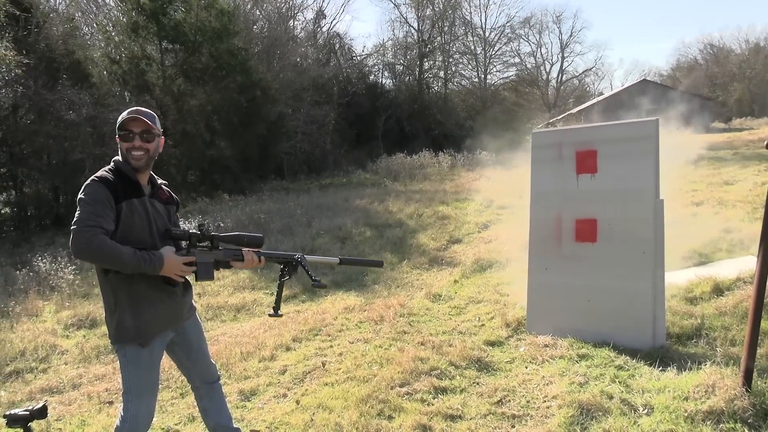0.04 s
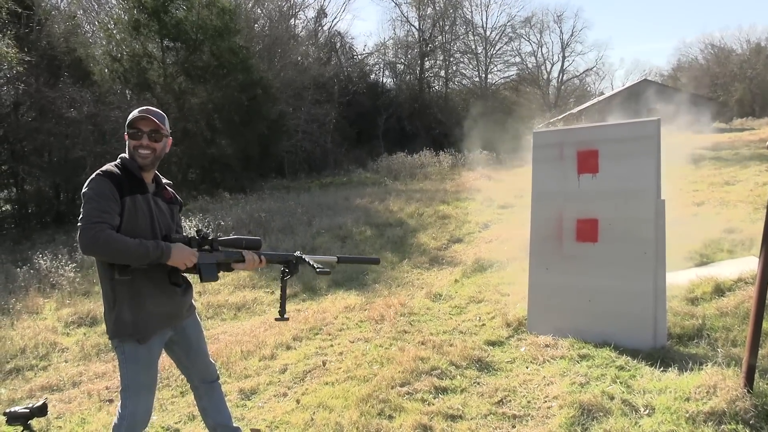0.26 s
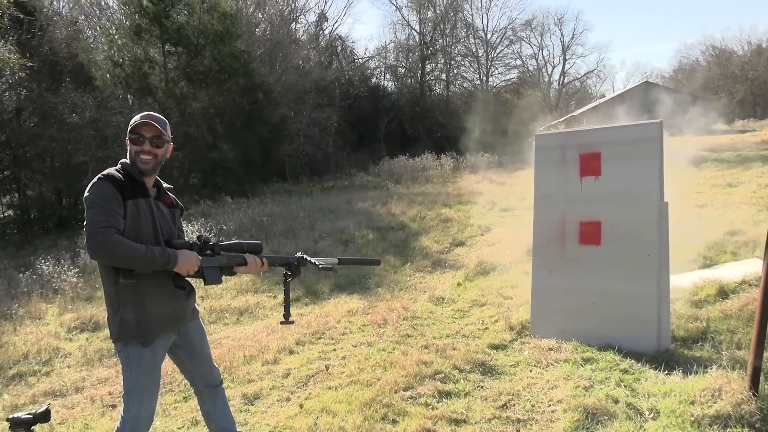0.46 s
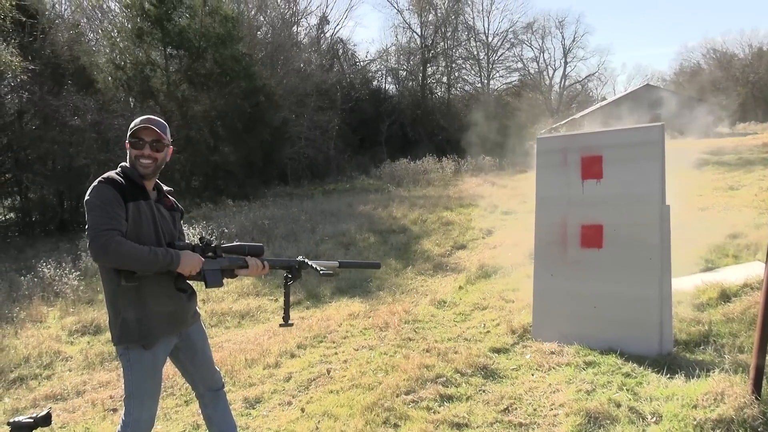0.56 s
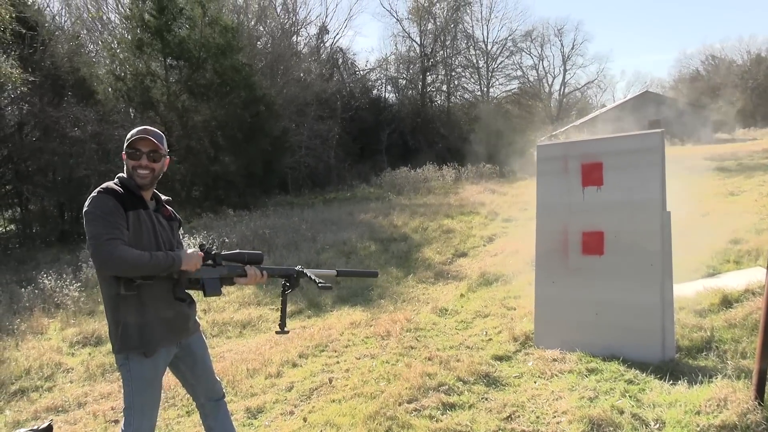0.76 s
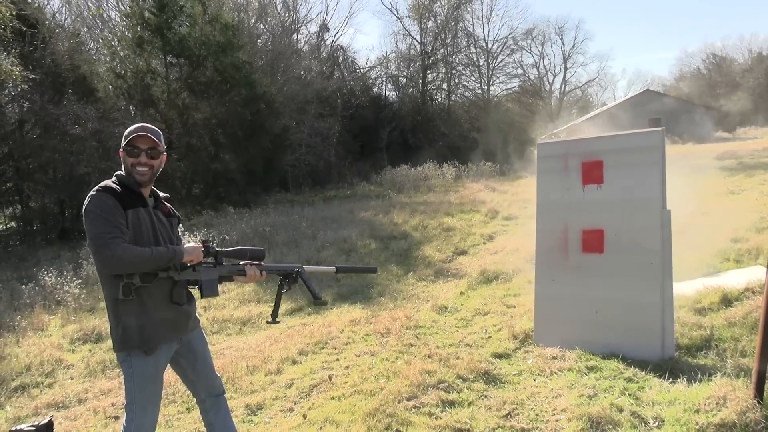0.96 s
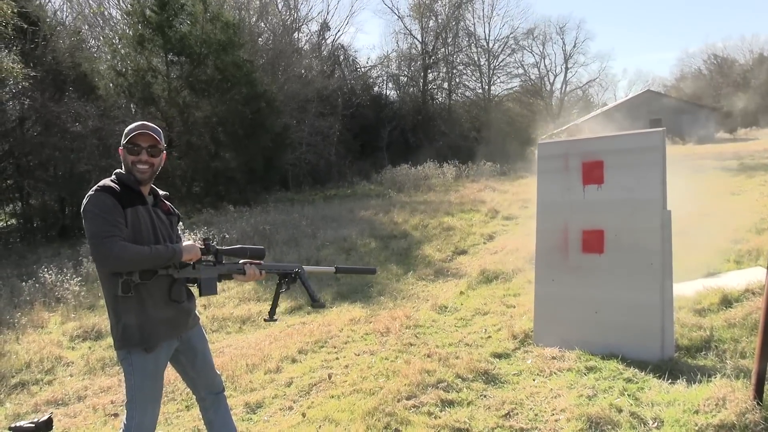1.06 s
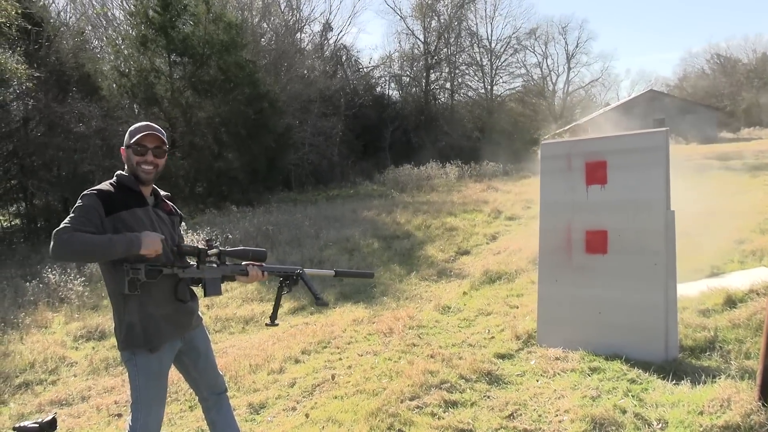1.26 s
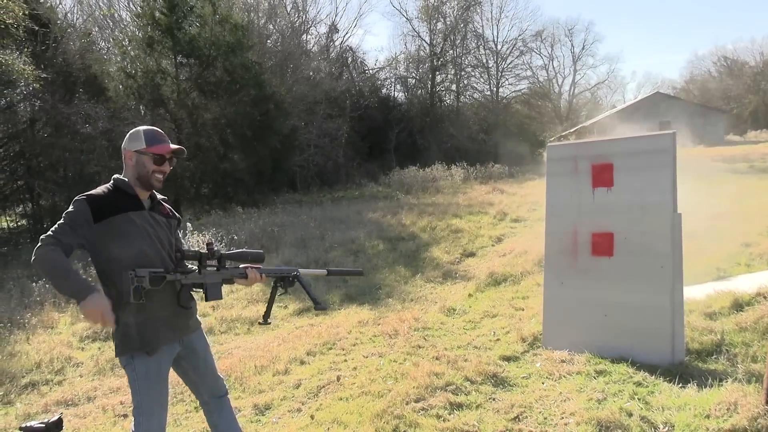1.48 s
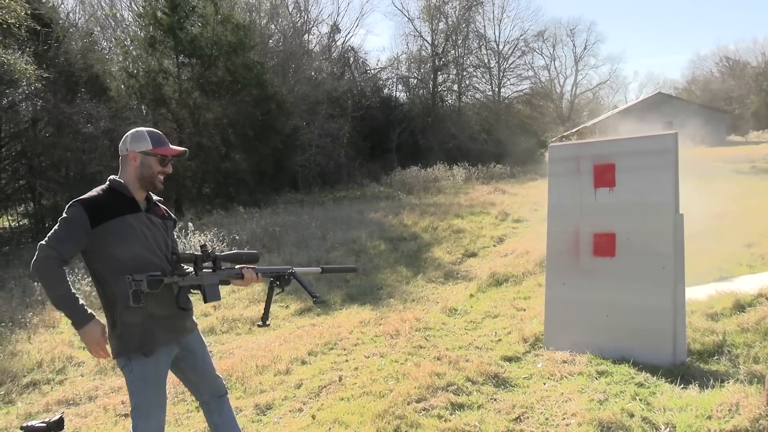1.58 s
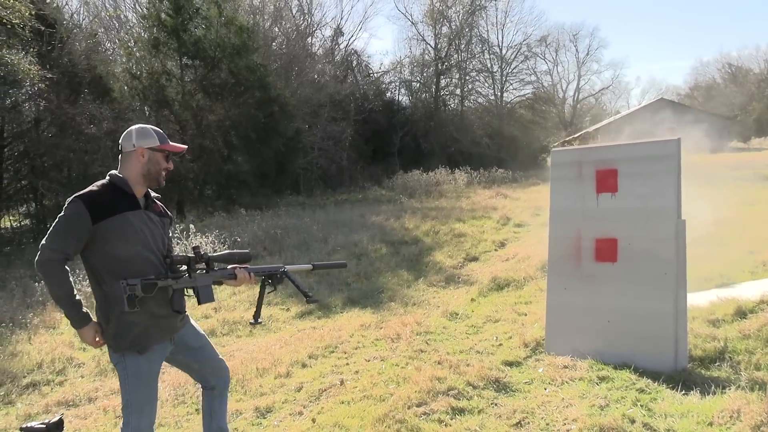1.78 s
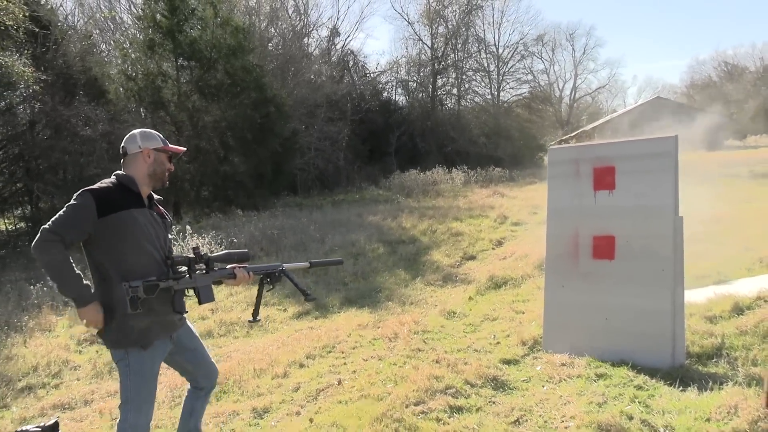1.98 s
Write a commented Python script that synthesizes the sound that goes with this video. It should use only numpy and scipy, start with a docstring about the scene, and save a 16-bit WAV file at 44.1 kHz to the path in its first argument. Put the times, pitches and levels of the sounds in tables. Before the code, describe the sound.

Rifle bolt snaps back with a tight bright double crack, then slides forward and locks in a quick cluster of clicks; open range, faint reflections, low wind buffeting the nearly mono microphone, cloth rustle at the end.

```python
"""Rifle bolt worked on a grass range

A few metres from the microphone a bolt is pulled back against its stop, then pushed home.
Each steel contact is a noise crack plus dying sines; sliding is gritty noise, and a small part pings.
A concrete wall and trees return faint echoes as filtered noise tails.
Shaped noise makes the wind buffeting the microphone and a jacket that rustles most at the end."""
import sys
import numpy as np
from scipy import signal
from scipy.fft import rfft, irfft
from scipy.io import wavfile
from scipy.ndimage import uniform_filter1d

SR = 44100
rng = np.random.default_rng(int(sys.argv[2]) if len(sys.argv) > 2 else 0)


def store_pcm(level_fs):
    """Save levels as 16-bit WAV."""
    pcm = np.round(np.clip(level_fs, -1, 1) * 32767).astype(np.int16)
    wavfile.write(sys.argv[1], SR, np.atleast_2d(pcm).T)


N = 89434  # length [samples]


def bolt():
    """Both strokes: sums the steel contacts, loose parts, squeaks, ping and friction."""
    return strokes() + loose_part() + handle_knock() + squeaks() + pinging_part() + sliding()


# Contacts as the bolt is pulled back:
# (time [s], relative level [dB], T60 [s], bass [dB], treble [dB], relative ring level [dB])
PULL_CONTACTS = [(.590, -52.5, 0.078, -2, -24, -18), (.660, -47, 0.074, -14.5, -18.5, -15.5),
                 (.672, -46, 0.032, 3.5, -26.5, -18), (.8257, -12, 0.014, -13, -3.5, -15),
                 (.8281, -22, 0.054, 3, -6.5, -23), (.8372, -23, 0.018, 5.5, 13.5, -17.5),
                 (.8389, -10, 0.0088, -8, 7, -3.5), (.8408, -16, 0.015, -3, -8, 5),
                 (.852, -36.5, 0.023, -5.5, 8.5, -12.5), (.876, -30.5, 0.027, 4, -7.5, -6),
                 (.881, -44, 0.038, 4, -7, -12), (.896, -48.5, .03, 1.5, 1.5, -11.5)]
# Contacts as the bolt runs forward and shuts, same columns
PUSH_CONTACTS = [(1.076, -49.5, 0.036, 5.5, -11, -6), (1.1338, -34, 0.015, 7.5, -1, -23),
                 (1.1375, -29, 0.021, 7, -9.5, -2), (1.1528, -41, 0.041, -1.5, -3, -10.5),
                 (1.1578, -50, 0.028, -3, -0.5, -10), (1.166, -25, 0.034, -6.5, -1.5, -14.5),
                 (1.181, -38, 0.032, 0.5, 1, -9), (1.1855, -20, 0.023, -17.5, -3.5, -26),
                 (1.1882, -27.5, .035, -9, -14.5, -16), (1.1972, -17.5, 0.011, -21, 4.5, -26.5),
                 (1.2029, -14, 0.011, -22, -5, -24.5), (1.2107, -18, 0.015, 10, 10, -13.5),
                 (1.2123, -9.5, .022, -0.5, 2, 1.5), (1.2175, -19, 0.028, 3.5, -27, -0.5)]
# Colour of a crack at the rear stop: (frequency [Hz], level [dB])
OPEN_CRACK_COLOUR = [(100, -36.5), (300, -24.5), (430, -13), (600, -0.5), (820, -4), (1400, -2),
                     (2100, -0.5), (2900, 0), (4200, -1.5), (5000, -0.5), (5800, -6), (7200, 0),
                     (8900, -5.5), (10000, -13.5), (14000, -18), (16000, -30)]
# Colour of a crack as the bolt shuts: (frequency [Hz], level [dB])
SHUT_CRACK_COLOUR = [(100, -33), (300, -26), (480, -10.5), (640, -2), (800, -10), (1000, -3), (1300, -6.5),
                     (1550, -1), (1850, 1.5), (2300, 2.5), (3500, -1.5), (4000, -1.5), (4400, 1.5),
                     (5000, -3.5), (8500, -8.5), (10000, -13.5), (14000, -11), (16000, -29)]
# Modes of the action with the bolt back: (frequency [Hz], level [dB], T60 [s])
BOLT_BACK_MODES = [(547, -23, 0.031), (608, -19, 0.036), (1560, -34.5, 0.031), (2050, -20, .03),
                   (2690, -19.5, 0.062), (2912, -22.5, 0.034), (3630, -10, 0.018), (6600, -21, 0.015),
                   (7150, -15.5, 0.017), (7680, -21, 0.018), (8600, -21.5, 0.021)]
# Modes of the action with the bolt forward: (frequency [Hz], level [dB], T60 [s])
BOLT_FORWARD_MODES = [(338, -38, .18), (610, -41, .14), (660, -20, .035), (921, -23, .06), (974, -20, .12),
                      (1025, -17, .05), (1620, -31, .04), (2175, -21, .04), (2270, -16, .04),
                      (2412, -24, .11), (2710, -19, .055), (3040, -25, .06), (3354, -24, .045),
                      (3520, -21, .05), (3700, -28, .1), (4590, -25, .05), (6280, -20, .035)]


def strokes():
    """Steel meets steel on the way back, then on the way forward, exciting the action each time."""
    out = np.zeros(N)
    for s, *row in PULL_CONTACTS:
        add(out, s, contact(*row, OPEN_CRACK_COLOUR, BOLT_BACK_MODES))
    for s, *row in PUSH_CONTACTS:
        add(out, s, contact(*row, SHUT_CRACK_COLOUR, BOLT_FORWARD_MODES))
    return out


ATTACK_S = 0.00031  # time constant of every onset [s]
BASS_HZ, TREBLE_HZ = 1130, 6030  # corners of the bass and treble shelves [Hz]
RATTLE = .02  # rms share by which the pitch of a loose part wavers


def contact(db, t60, bass_db, treble_db, ring_db, colour, modes):
    """A crack of dense short resonances, as decaying noise, plus the clear modes of the action."""
    t = np.arange(SR // 8) / SR
    envelope = amp(-60 * t / t60) * (1 - np.exp(-t / ATTACK_S))
    burst = unit(rng.standard_normal(len(t)) * envelope)
    burst = burst * np.sqrt(np.mean(envelope ** 2))

    def crack_db(f):
        bass = bass_db / (1 + (f / BASS_HZ) ** 2)
        treble = treble_db * f ** 4 / (f ** 4 + TREBLE_HZ ** 4)
        return read(colour, f) + bass + treble

    crack = causal(burst, crack_db)
    # the action wavers half as much as a loose part
    sound = amp(ring_db + 7.5) * ring(modes, rattle=RATTLE / 2)
    add(sound, 0, amp(8.5) * crack)
    return amp(db) * sound


RATTLE_HZ = 110  # the waver is noise averaged over half a period of this frequency [Hz]


def ring(modes, pitch=1, length=1, rattle=0):
    """Dying sines of a struck part; rattle makes the pitch of each one waver at random."""
    t = np.arange(SR // 2) / SR
    tones = np.zeros(len(t))
    for hz, db, t60 in modes:
        waver = uniform_filter1d(rng.standard_normal(len(t)), size=round(SR / RATTLE_HZ / 2))
        frequency = hz * pitch * (1 + rattle * unit(waver))
        turns = np.cumsum(frequency) / SR + rng.random()
        decay = amp(db - 60 * t / (t60 * length))
        tones += decay * np.sin(2 * np.pi * turns)
    return tones * (1 - np.exp(-t / ATTACK_S))


# Small pinging part: (frequency [Hz], level [dB], T60 at full ring time [s])
PING_MODES = [(9857, -22, .2), (9795, -33, .24), (14935, -42, .17), (15520, -37, .17), (15628, -34, .19)]
# Blows on it: (time [s], level [dB], pitch ratio, share of the full ring time)
PING_BLOWS = [(1.166, -13, 1.042, .35), (1.186, -19, 1.005, .6), (1.2115, 0, 1, 1)]


def pinging_part():
    """High modes of a small part, set ringing by the closing stroke."""
    out = np.zeros(N)
    for s, db, pitch, length in PING_BLOWS:
        add(out, s, amp(db) * ring(PING_MODES, pitch, length))
    return out


# Squeaks of steel just before the bolt locks: (time [s], level [dB], frequency [Hz], T60 [s])
SQUEAKS = [(1.1955, -27.5, 7980, 0.0084), (1.2024, -10, 5090, 0.0083)]


def squeaks():
    """Each short squeak of steel is one rapidly dying sine."""
    out = np.zeros(N)
    for s, db, hz, t60 in SQUEAKS:
        add(out, s, ring([(hz, db, t60)]))
    return out


# Loose part shaken by the stop: (frequency [Hz], level [dB], T60 [s])
LOOSE_MODES = [(601, -5, 0.19), (973, 6.5, 0.13), (1810, -11, 0.078), (3020, -9, 0.32), (3530, -15.5, 0.2),
               (4800, -3.5, 0.11), (5300, -6, .12)]
# Its shakes: (time [s], level [dB])
LOOSE_HITS = [(0.842, -41), (.8765, -43)]


def loose_part():
    """A part that sits loosely chatters as it rings, so its modes waver in pitch."""
    out = np.zeros(N)
    for s, db in LOOSE_HITS:
        add(out, s, amp(db) * ring(LOOSE_MODES, rattle=RATTLE))
    return out


# Bolt handle: (frequency [Hz], level [dB], T60 [s])
HANDLE_MODES = [(745, 0, 0.076), (1440, -4, 0.041), (3500, -7, 0.033)]
# The hand's one blow on it: (time [s], level [dB])
HANDLE_KNOCK = (1.078, -43)


def handle_knock():
    """The hand knocks the handle as it starts to push, ringing three wavering modes."""
    out = np.zeros(N)
    s, db = HANDLE_KNOCK
    add(out, s, amp(db) * ring(HANDLE_MODES, rattle=RATTLE))
    return out


# Bolt sliding in its race: (time [s], level [dB])
SLIDE_LEVEL = [(.79, -74.5), (.818, -53), (.835, -39.5), (.86, -57.5), (.872, -65), (.89, -49), (.91, -59),
               (1.04, -84.5), (1.10, -56.5), (1.128, -65.5), (1.14, -48), (1.16, -44.5), (1.187, -34.5),
               (1.205, -33), (1.23, -42), (1.27, -51.5), (1.33, -63), (1.37, -104)]
# Colour of the plain friction: (frequency [Hz], level [dB])
SLIDE_COLOUR = [(200, -12), (700, 0), (2000, 0), (5000, -6), (8700, -4.5), (10000, -18.5), (16000, -20.5)]
# Resonances rubbed by the bolt: (frequency [Hz], half-width at -6 dB [Hz], level [dB])
RACE_RESONANCES = [(1589, 110, -2), (2380, 130, -8.5), (3370, 450, -5.5), (4420, 100, -9),
                   (5000, 280, -7.5)]
SLIDE_GRAIN_DB = 4  # rms swing of the grit [dB]


def sliding():
    """Gritty friction that sings a little in the resonances of the race."""
    hz = np.fft.rfftfreq(N, 1 / SR)
    body = np.zeros(N)
    for f, width, db in RACE_RESONANCES:
        spectrum = rfft(rng.standard_normal(N)) / (1 + ((hz - f) / width) ** 2)
        body += amp(db) * unit(irfft(spectrum, N))
    swing = unit(uniform_filter1d(rng.standard_normal(N), size=60))
    grit = amp(SLIDE_GRAIN_DB * swing)
    return level(SLIDE_LEVEL) * unit((noise(SLIDE_COLOUR) + body) * grit)


# Scatter nearby, decay: (frequency [Hz], T60 before build-up [s])
NEAR_T60 = [(300, 0.22), (1000, 0.22), (4000, 0.2), (9000, 0.19), (14000, 0.12)]
# Its colour: (frequency [Hz], level [dB])
NEAR_COLOUR = [(300, 4), (1000, -3), (5000, -10.5), (9000, -7), (10500, 3.5), (16000, -5)]
# Wash from the trees, decay: (frequency [Hz], T60 before build-up [s])
TREES_T60 = [(300, 0.33), (1000, 0.87), (4000, 1), (14000, 0.19)]
# Its colour: (frequency [Hz], level [dB])
TREES_COLOUR = [(300, 18), (1000, -21.5), (2500, -0.5), (5000, -10.5), (9000, 0), (15000, -15)]
# Smear of the concrete wall's echo: (frequency [Hz], T60 before build-up [s])
WALL_T60 = [(300, 0.32), (2000, 0.15), (8000, 0.056)]
# Its colour: (frequency [Hz], level [dB])
WALL_COLOUR = [(300, 3), (650, 3), (1500, -4.5), (2400, 2), (4000, -5), (8000, -7.5), (15000, -12.5)]
NEAR_DB, TREES_DB, WALL_DB = -14, -40, -36.5  # gains on top of the colours [dB]
TREES_RISE_S, WALL_S = 0.17, .09  # build-up of the trees, delay of the wall [s]


def outdoors(x):
    """Scatter nearby, one smeared echo off a concrete wall, and a faint wash from the trees."""
    near = amp(NEAR_DB) * tail(NEAR_T60, 0.0023, NEAR_COLOUR)
    trees = amp(TREES_DB) * tail(TREES_T60, TREES_RISE_S, TREES_COLOUR)
    out = x + signal.fftconvolve(x, near + trees)[:N]
    wall = tail(WALL_T60, 0.0073, WALL_COLOUR)
    add(out, WALL_S, amp(WALL_DB) * signal.fftconvolve(x, wall))
    return out


def tail(t60s, rise_s, colour=((100, 0), (10000, 0))):
    """Scattered reflections as noise that builds up, then dies band by band."""
    hz, t, bands = signal.stft(rng.standard_normal(SR), SR, nperseg=256)
    decay = amp(-60 * t / read(t60s, hz)[:, None])
    taps = signal.istft(bands * decay, SR, nperseg=256)[1][:SR]
    taps = taps * np.minimum(np.arange(SR) / SR / rise_s, 1) ** 2
    return causal(taps / np.linalg.norm(taps), lambda f: read(colour, f))


# Jacket rustle: (time [s], level [dB])
RUSTLE_LEVEL = [(0, -71), (.3, -71.5), (.5, -75), (.59, -69), (.63, -99), (.78, -70), (.86, -59),
                (.95, -64.5), (1.05, -71), (1.11, -58.5), (1.25, -67), (1.55, -75.5), (1.68, -63),
                (1.73, -59.5), (1.79, -60.5), (1.81, -52), (1.87, -59), (2.02, -58)]
# Colour of the cloth: (frequency [Hz], level [dB])
CLOTH_COLOUR = [(200, 4.5), (800, 13), (2000, 8.5), (5000, 5.5), (7400, 5.5), (8500, 7.5), (9500, 2),
                (10700, -0.5), (12800, 0.5), (16000, -8)]


def jacket():
    """Cloth brushing as the arm moves: coloured noise with a fine random grain."""
    swing = unit(uniform_filter1d(rng.standard_normal(N), size=200))
    grain = amp(1.5 * swing)
    return level(RUSTLE_LEVEL) * unit(noise(CLOTH_COLOUR) * grain)


# Wind's rumble: (time [s], level before RUMBLE_DB [dB])
GUST_LEVEL = [(0, -26), (.13, -30), (.3, -24), (.46, -28), (.67, -20), (.85, -26), (1.05, -24), (1.2, -25),
              (1.34, -22), (1.44, -35), (1.62, -36), (1.72, -26), (1.8, -30), (1.9, -19), (2.02, -23)]
# Colour of the rumble: (frequency [Hz], level [dB])
RUMBLE_COLOUR = [(2, -13), (6, 1.5), (10, 10.5), (16, 2.5), (24, -1), (34, -10), (48, -14.5), (70, -24),
                 (130, -65.5), (600, -120)]
# Buffeting on the microphone: (time [s], level [dB])
BUFFET_LEVEL = [(.02, -38), (.06, -45), (.26, -47), (.31, -38), (.38, -43), (.49, -43), (.555, -34),
                (.63, -39), (.72, -37), (.83, -38), (.95, -42), (.98, -38), (1.02, -42), (1.1, -40),
                (1.16, -44), (1.24, -38), (1.31, -39), (1.45, -51), (1.62, -49), (1.71, -37), (1.8, -42),
                (1.9, -31.5), (1.96, -33), (2.02, -36)]
# Colour of the buffets: (frequency [Hz], level [dB])
BUFFET_COLOUR = [(30, -19), (60, 1.5), (90, -2), (130, -11), (190, -16), (300, -27), (500, -34),
                 (1200, -64), (6000, -110)]
# How quickly the eddies come: (frequency [Hz], level [dB])
FLUTTER_COLOUR = [(2, -25), (10, 0), (30, -2), (80, -20), (300, -70)]
# Colour of the distant air: (frequency [Hz], level [dB])
AIR_COLOUR = [(100, 6), (400, 1), (900, -0.5), (1500, -7), (3000, -12.5), (6000, -22), (9000, -36),
              (11000, -44.5), (16000, -40.5)]
RUMBLE_DB, BUFFET_DB, AIR_DB = 10, 0, -59.5  # layer gains [dB]
FLUTTER_DB = 4  # greatest swing of the flutter either way [dB]


def wind():
    """Slow rumble and quicker buffets, fluttering with the eddies, over steady distant air."""
    flutter = amp(FLUTTER_DB * np.tanh(noise(FLUTTER_COLOUR)))
    rumble = amp(RUMBLE_DB) * level(GUST_LEVEL) * noise(RUMBLE_COLOUR)
    buffets = amp(BUFFET_DB) * level(BUFFET_LEVEL) * unit(noise(BUFFET_COLOUR) * flutter)
    air = amp(AIR_DB) * noise(AIR_COLOUR)
    return rumble + buffets + air


def amp(db):
    """Decibels to gain."""
    return 10 ** (np.asarray(db) / 20)


def unit(x):
    """Scales to rms 1."""
    return x / np.sqrt(np.mean(x ** 2) + 1e-20)


def read(points, hz):
    """Reads a table on a log-frequency axis."""
    f, value = np.transpose(points)
    return np.interp(np.log(hz + 1), np.log(f + 1), value)


def level(points):
    """Gain over time from a curve in dB."""
    s, db = np.transpose(points)
    return amp(np.interp(np.arange(N) / SR, s, db))


def add(mix, s, sound):
    """Mixes a sound in at a time in seconds."""
    part = mix[round(s * SR):][:len(sound)]
    part += sound[:len(part)]


def noise(colour):
    """Steady noise of a given spectrum, at rms 1."""
    gain = amp(read(colour, np.fft.rfftfreq(N, 1 / SR)))
    return unit(irfft(rfft(rng.standard_normal(N)) * gain, N))


def causal(x, gain_db, size=2048):
    """Colours a sound with a minimum-phase filter; gain_db is a function of frequency."""
    log_gain = np.log(amp(gain_db(abs(np.fft.fftfreq(size, 1 / SR)))))
    # the Hilbert transform of the log gain gives the minimum phase
    response = np.exp(np.conj(signal.hilbert(log_gain)))
    return signal.fftconvolve(x, np.fft.ifft(response).real[:size // 2])


SIDE_DB, SPREAD_DB = -38.5, -25.5  # gain of the side signal, and of the scatter inside it [dB]


def scene():
    """All sits in the middle; only traces of wind, jacket and scatter differ between the sides."""
    rifle = bolt()
    scatter = amp(SPREAD_DB) * signal.fftconvolve(rifle, tail(NEAR_T60, .006))[:N]
    mid = outdoors(rifle) + wind() + jacket()
    side = amp(SIDE_DB) * (wind() + jacket() + scatter)
    return np.array([mid + side, mid - side])


EDGE_HZ = 15850  # low-pass cutoff [Hz]


def record(dry):
    """The recorder's band limit: a steep linear-phase low-pass."""
    lowpass = signal.firwin(511, EDGE_HZ, window=("kaiser", 9), fs=SR)
    return signal.oaconvolve(dry, lowpass[None], "same")


dry = scene()
out = record(dry)
store_pcm(out)
```